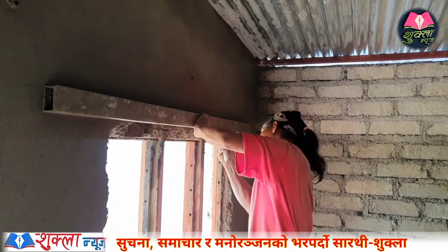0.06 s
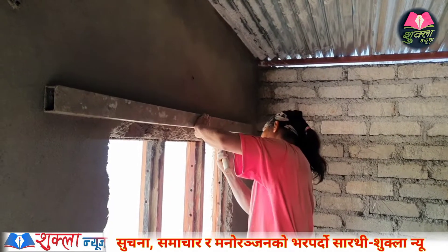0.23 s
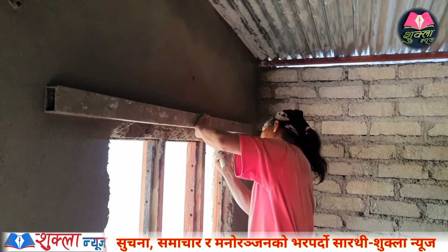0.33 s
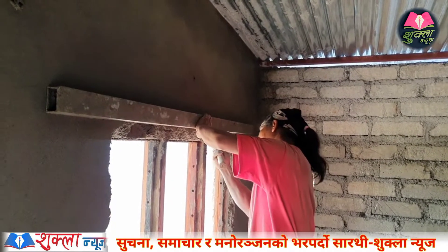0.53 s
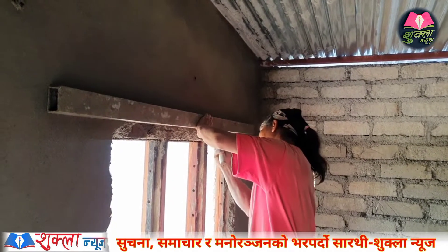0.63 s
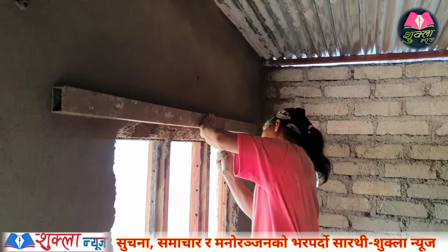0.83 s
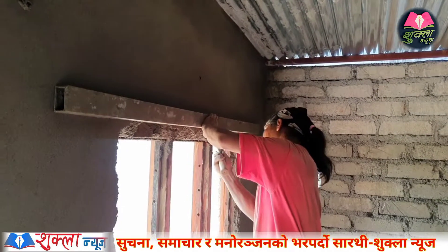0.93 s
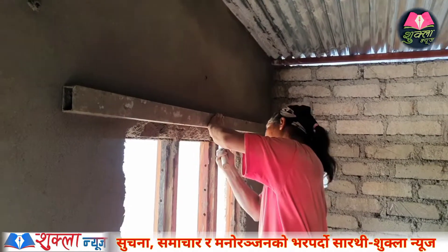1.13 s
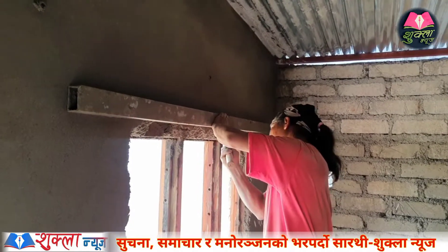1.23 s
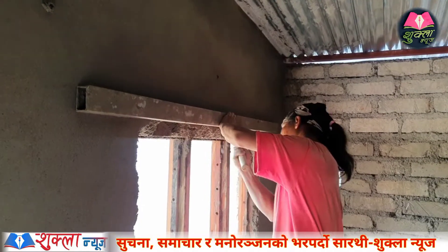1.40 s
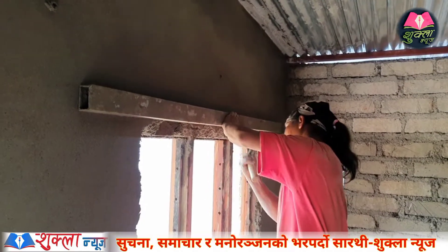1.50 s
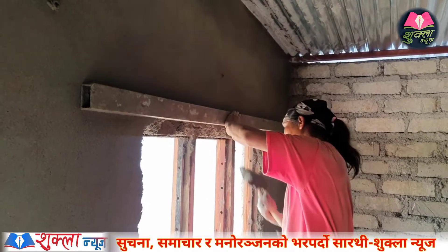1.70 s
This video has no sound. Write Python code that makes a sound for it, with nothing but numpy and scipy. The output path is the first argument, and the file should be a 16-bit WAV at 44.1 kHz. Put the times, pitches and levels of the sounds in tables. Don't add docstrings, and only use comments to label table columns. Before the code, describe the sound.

A hollow metal bar scrapes over gritty wet plaster in short strokes, two ending in ringing slaps, then another rasp with soft mortar thuds; small bare brick room, close phone microphone, faint bird chirps between strokes.

```python
import sys
import numpy as np
from scipy import signal
from scipy.fft import rfft, irfft
from scipy.io import wavfile
from scipy.ndimage import uniform_filter1d

SR = 44100
rng = np.random.default_rng(int(sys.argv[2]) if len(sys.argv) > 2 else 0)


def elevation(decibels):
    levels = np.asarray(decibels, float)
    return 10 ** (levels / 20)


def int16_out(signal):
    q = np.round(np.clip(np.atleast_2d(signal).T, -1, 1) * 32767)
    wavfile.write(sys.argv[1], SR, q.astype(np.int16))


N = 77175


def colour(x, table, scale=1):
    hz, db = np.array(table, float).T
    grid = np.maximum(np.arange(2049) * SR / 4096, 1)
    log_gain = np.interp(np.log(grid), np.log(hz), db * scale) * np.log(10) / 20
    cepstrum = irfft(log_gain)
    cepstrum[1:2048] *= 2
    cepstrum[2049:] = 0
    impulse = irfft(np.exp(rfft(cepstrum)))
    return signal.fftconvolve(x, impulse)[:len(x)]


def unit(x):
    return x / np.sqrt(np.mean(x ** 2))


def ticks(per_s, spread_db):
    present = rng.random(N) < per_s / SR
    sign = np.sign(rng.standard_normal(N))
    return unit(present * sign * elevation(spread_db * rng.exponential(size=N)))


def walk(hz):
    k = int(SR / hz)
    return unit(uniform_filter1d(uniform_filter1d(rng.standard_normal(N), k), k))


def burst(start, db, rise, decay):
    u = np.arange(N) / SR - start
    return elevation(db) * np.clip(u / rise, 0, 1) * np.exp(-np.maximum(u - rise, 0) / decay)


def ring(x, modes):
    out = 0
    for hz, db, t60 in modes:
        pole = np.exp(2j * np.pi * hz / SR - np.log(1000) / (t60 * SR))
        mode = signal.lfilter([1, 0, -1], [1, -2 * pole.real, abs(pole) ** 2], x)
        out = out + elevation(db) * mode / np.sqrt(t60)
    return out


def body(x, env, table, modes, ring_db):
    direct = colour(x * env, table) / np.std(colour(x, table))
    ringing = ring(x * env, modes) / np.std(ring(x, modes))
    return direct + elevation(ring_db) * ringing


def pair(n):
    shared_hz, apart_db = 584, -3
    low, high = (signal.butter(1, shared_hz, kind, fs=SR) for kind in ("low", "high"))
    apart = rng.standard_normal((2, n))
    bass = rng.standard_normal(n) + elevation(apart_db) * apart[::-1]
    return signal.lfilter(*low, bass) + signal.lfilter(*high, apart)


# (f/Hz, level/dB, t60/s)
BAR_MODES = [(482.5, -2.5, 0.43), (812, -24, 0.36), (1018, -26, 0.11), (1212, -11, 0.13), (2324, -8, 0.59),
             (2626, 7, 0.75), (2705, 14, 0.51), (2816, 7, 0.16), (3164, 8.5, 0.095), (3442, 10, 0.067),
             (3650, -12, .1), (3980, -4.5, 0.05), (4830, 4.5, 0.067), (6180, -7.5, 0.045)]


def strike_bar(x, env, table, ring_db):
    damping = 0.36
    modes = [(hz, db, t60 * damping) for hz, db, t60 in BAR_MODES]
    return body(x, env, table, modes, ring_db)


# (t/s, level/dB)
PRESSURE = [(0.095, -54.5), (0.104, -42), (0.189, -38), (0.258, -27.5), (.3, -46), (.6, -70),
            (0.726, -48.5), (0.755, -39), (.78, -36), (0.869, -35.5), (.91, -47.5), (1.21, -74.5),
            (1.363, -53), (1.387, -41.5), (1.429, -49), (1.538, -34.5), (1.565, -51), (1.65, -49.5)]
# (f/Hz, level/dB)
SCRAPE_COLOUR = [(220, -38.5), (550, -19), (950, -10), (1500, -14), (2250, -11), (2600, -6), (3800, -3),
                 (4500, -11.5)]


def scrape():
    judder_db, judder_hz, lift_s = 1.3, 110, 0.038
    t = np.arange(N) / SR
    s, db = np.array(PRESSURE).T
    press = elevation(np.interp(t, s, db) + judder_db * walk(judder_hz))
    press = press * np.exp(-np.maximum(t - s[-1], 0) / lift_s)
    next_stroke = burst(1.728, -49.5, 0.008, lift_s)
    grit = ticks(per_s=9000, spread_db=2)
    return strike_bar(grit, press + next_stroke, SCRAPE_COLOUR, ring_db=-16)


# (t/s, crack level/dB, chatter level/dB, chatter decay/s, low level/dB)
SLAPS = [
    (0.264, -13, -21, 0.034, -1),
    (0.289, -30.5, -26, 0.027, 3.5),
    (0.873, -29, -31.5, 0.011, -4),
    (.883, -27.5, -31, 0.031, 2),
]
# (f/Hz, level/dB)
SLAP_COLOUR = [(200, -35.5), (620, -14.5), (1050, -3), (1500, -13.5), (2200, -9), (2600, -4.5),
               (4000, -4.5), (4500, -10.5)]


def slaps():
    rise_s, crack_s = 0.0055, 0.0052
    chatter = ticks(per_s=3300, spread_db=2.5) + 0.73 * rng.standard_normal(N)
    out = 0
    for start, crack_db, chatter_db, decay, low_db in SLAPS:
        env = burst(start, crack_db, rise_s, crack_s) + burst(start, chatter_db, rise_s, decay)
        hit = strike_bar(chatter, env, SLAP_COLOUR, ring_db=-8.5)
        out = out + colour(hit, [(1200, low_db), (2200, 0)])
    return out


# (t/s, level/dB, rise/s, decay/s, brightest f/Hz)
SLUMPS = [
    (0, -50, 0.0017, 0.034, 970),
    (0.419, -52, 0.041, 0.1, 288),
    (.575, -59.5, 0.037, 0.11, 254),
    (1.0, -63, 0.028, 0.078, 193),
    (1.529, -41.5, 0.038, 0.024, 378),
    (1.598, -43, 0.028, 0.026, 3050),
    (1.665, -47.5, 0.0067, 0.029, 860),
]
# (f/Hz, level/dB)
SLUMP_COLOUR = [(40, -25), (82, -9.5), (134, -19), (195, -6), (300, -5.5), (540, -8.5), (800, -5),
                (2000, -17)]
# (f/Hz, level/dB, t60/s)
BOARD_MODES = [(82, -3.5, 0.06), (188, -7.5, 0.066), (470, -17, 0.022), (552, 4, 0.023)]


def mortar():
    lumps = ticks(per_s=4000, spread_db=1.5)
    out = 0
    for *shape, brightest_hz in SLUMPS:
        thud = body(lumps, burst(*shape), SLUMP_COLOUR, BOARD_MODES, ring_db=-9)
        out = out + signal.lfilter(*signal.butter(2, brightest_hz, fs=SR), thud)
    return out


# (t/s, length/s, start f/Hz, end f/Hz, level/dB)
CHIRPS = [
    (1.136, 0.066, 3817, 3760, -61),
    (1.19, 0.025, 3800, 3350, -56.5),
    (1.222, 0.045, 3650, 3620, -63.5),
]


def bird():
    t = np.arange(N) / SR
    out = 0
    for start, length, hz0, hz1, db in CHIRPS:
        u = np.clip((t - start) / length, 0, 1)
        swell = np.sqrt(np.sin(np.pi * u) + 1e-12) * (u < 1)
        phase = 2 * np.pi * np.cumsum(hz0 + (hz1 - hz0) * u) / SR
        out = out + elevation(db) * swell * np.sin(phase)
    return out


def room(x):
    t60_s, low_t60_s, first_echo_s = 0.17, 0.49, 0.00091
    room_db, near_low_db, tail_low_db = 3.5, 5.5, -0.5
    u = np.arange(SR // 2) / SR
    noise = pair(SR // 2)
    low = signal.lfilter(*signal.butter(2, 330, fs=SR), noise)
    tail = (noise - low) * elevation(-60 * u / t60_s) + low * elevation(-60 * u / low_t60_s)
    spec = rfft(tail * (u > first_echo_s))
    even = uniform_filter1d(abs(spec) ** 2, size=31, axis=1)
    tail = irfft(spec * np.sqrt(even.mean() / even), len(u))
    tail = tail / np.sqrt(np.mean(np.sum(tail ** 2, axis=1))) * elevation(room_db)
    near, far = (colour(x, [(550, db), (900, 0)]) for db in (near_low_db, tail_low_db))
    echoes = signal.fftconvolve(far[None], tail, axes=1)[:, :N]
    return (near + echoes) / np.sqrt(1 + elevation(2 * room_db))


# (f/Hz, level/dB)
AIR_COLOUR = [(25, -27), (50, -8.5), (95, -15.5), (130, -34.5), (420, -31.5), (750, -18), (1800, -29),
              (3600, -20.5)]


def air():
    top_hz = 11600
    table = AIR_COLOUR + [(top_hz, AIR_COLOUR[-1][1]), (top_hz + 2000, -45)]
    hush = unit(np.array([colour(side, table) for side in pair(N)]))
    rumble = signal.lfilter(*signal.butter(2, 300, fs=SR), hush)
    hiss = hush - rumble
    return elevation(-61) * (rumble * elevation(-1 * walk(4.4)) + hiss * elevation(1.0 * walk(5.7)))


def scene():
    song = bird()
    indoors = room(scrape() + slaps() + mortar() + elevation(-4.5) * song)
    return indoors + song * np.array([[.6], [1]]) + air()


def top_cut(x):
    return signal.sosfilt(signal.butter(12, 15700, fs=SR, output="sos"), x)


# (f/Hz, level/dB)
TREBLE = [(6700, 5), (7150, -6.5), (7500, -9.5), (8100, -6), (11500, -2), (13800, -9), (14900, -21),
          (15600, -71)]
# (f/Hz, level/dB)
LEAN = [(60, -3), (380, -1), (800, 1), (1300, 3), (2400, -2.5), (4400, -8), (8000, 1.5), (14000, 12.5)]


def record(dry):
    ports = [colour(colour(v, TREBLE), LEAN, scale=side) for v, side in zip(dry, (.5, -.5))]
    return top_cut(np.array(ports))


dry = scene()
out = record(dry)
int16_out(out)
```